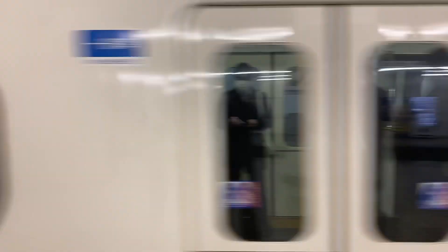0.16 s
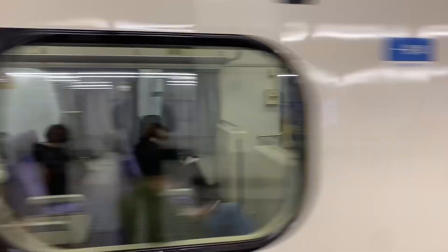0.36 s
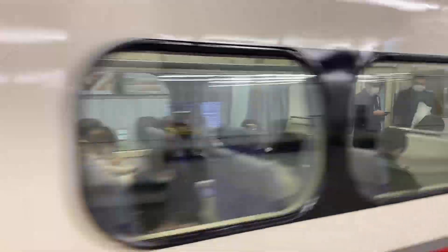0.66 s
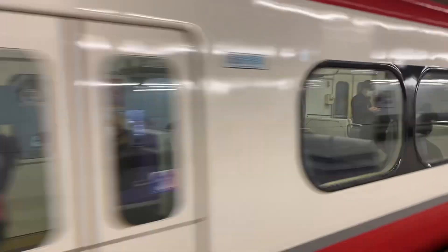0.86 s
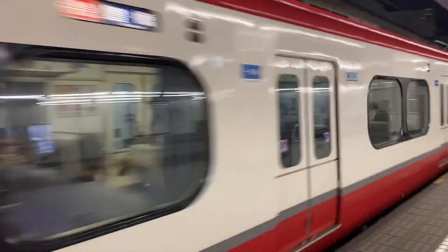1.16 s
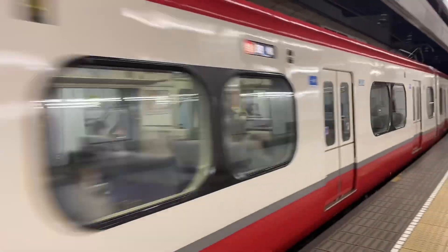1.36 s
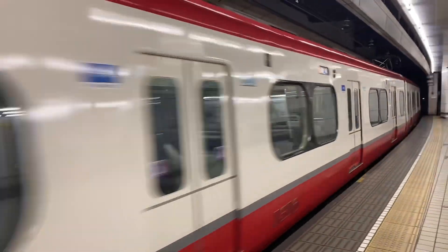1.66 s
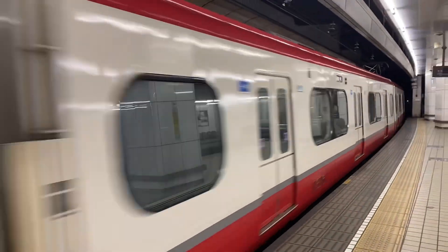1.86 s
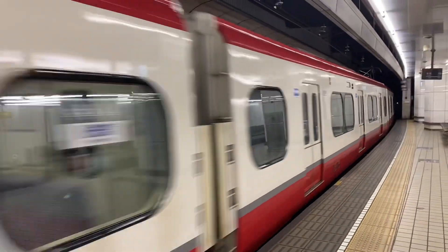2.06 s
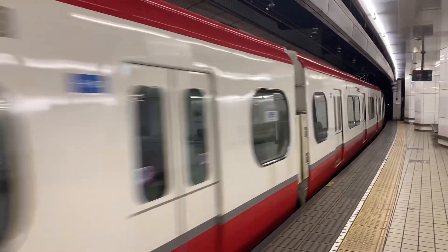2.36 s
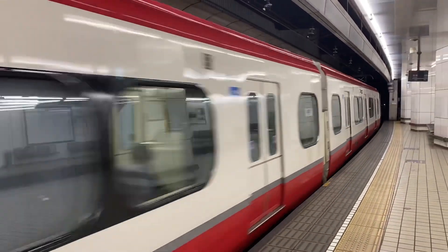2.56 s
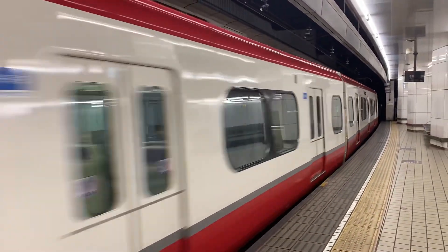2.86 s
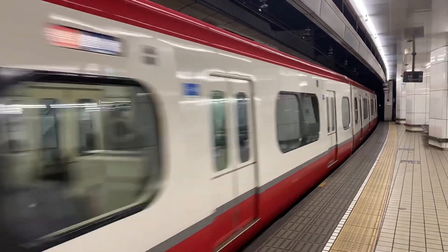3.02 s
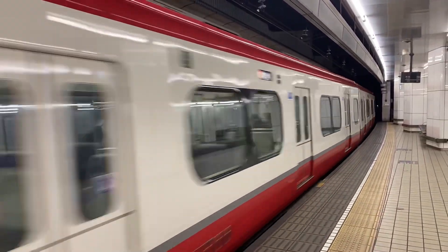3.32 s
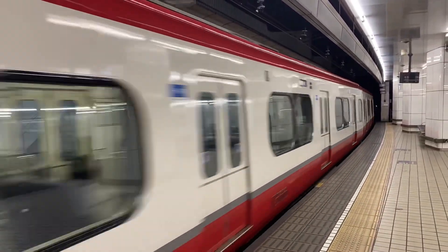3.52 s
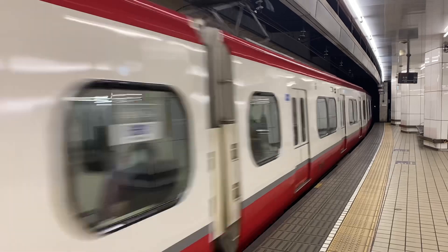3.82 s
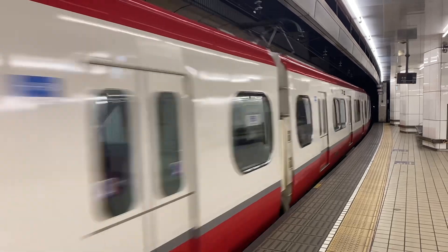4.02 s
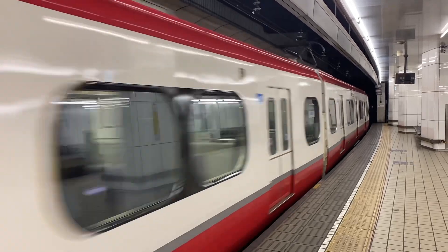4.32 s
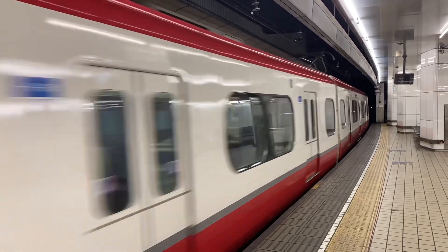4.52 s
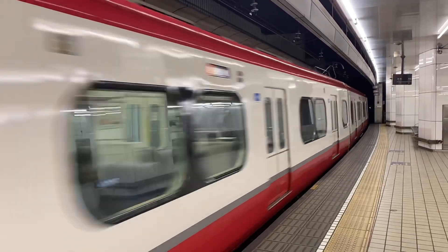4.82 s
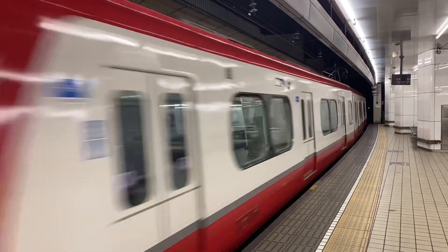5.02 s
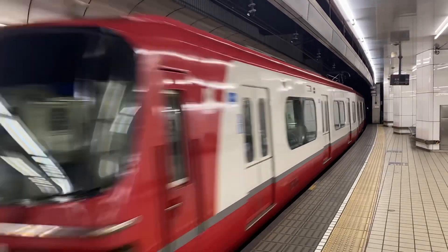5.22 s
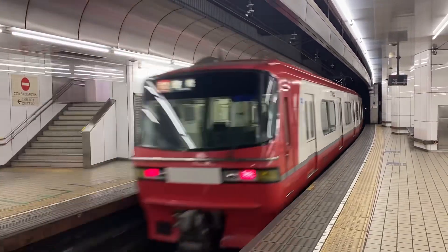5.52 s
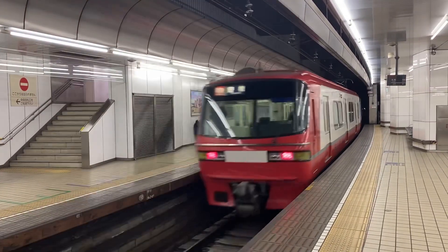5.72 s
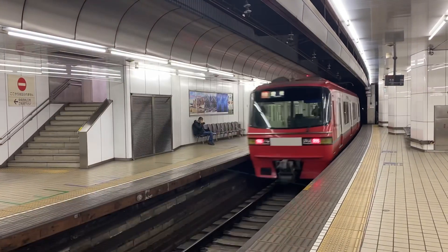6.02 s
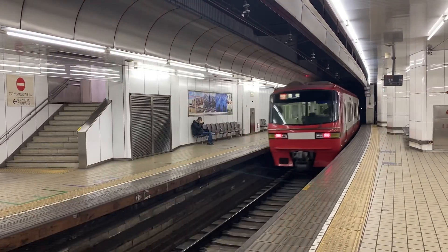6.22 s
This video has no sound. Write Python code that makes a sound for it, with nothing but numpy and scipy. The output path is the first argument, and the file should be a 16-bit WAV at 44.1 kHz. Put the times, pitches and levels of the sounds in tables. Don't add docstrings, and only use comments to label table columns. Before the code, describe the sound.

An electric train is already rushing past at 0 s, close to a stereo microphone on an underground platform edge, slightly nearer its left side. Low track rumble and hollow wheel roar fill the hard, echoing hall, with a thin ring of rails above. A mid-low gear whine climbs smoothly throughout, pulsing unevenly as side tones beat against it, strongest around 1.4 to 4.4 s. Dull thuds, booms and steel cracks cluster in the first 1.6 s, then recur near 2.0, 2.6, 3.2, 3.8, 4.3 and 4.8 s. Compressed air hisses brightly at 1.2 to 1.9 s with a brief breathy whistle, and more softly near 3 s. Airy gusts mark passing car gaps around 1.5, 3 and 5 s. The tail passes at about 5.25 s; whine and roar weaken, while heavy joint blows strike at 5.8 to 6.2 s, their boom lingering until the abrupt end at 6.4 s.

```python
import sys
import numpy as np
from scipy import signal
from scipy.fft import rfft, irfft, next_fast_len
from scipy.io import wavfile

SR = 44100
rng = np.random.default_rng(int(sys.argv[2]) if len(sys.argv) > 2 else 0)


def voltage_ratio(level):
    return 10 ** (np.asarray(level, float) / 20)


def unload_wav(signal):
    wavfile.write(
        sys.argv[1],
        SR,
        np.round(np.clip(np.atleast_2d(signal).T, -1, 1) * 32767).astype(np.int16),
    )


N = 281358

# time_s, pitch_hz
MESH_PITCH = [(0.0, 289.5), (1.25, 307.9), (1.75, 315.6), (2.1, 318.3), (2.5, 325.7), (3.0, 341.9),
              (3.2, 346.5), (3.5, 350), (4.0, 357.6), (4.5, 360.3), (5.25, 377.5), (6.38, 391.1)]
# time_s, level_db
WHEEL_NEARNESS = [(0.0, -2), (.2, 0.4), (0.45, -1), (0.72, -0.5), (1.0, 0), (1.25, 0), (1.62, 0.5),
                  (1.92, -1.5), (2.2, -1.5), (2.43, -4.5), (2.8, -3), (3.3, -1.5), (3.65, -4.5),
                  (4.15, -4.5), (4.42, -2.5), (4.95, -4.5), (5.25, -5.5), (5.79, -6), (6.05, -6)]
# pitch_hz, phase_rad
RIGHT_PHASE = [(40, .3), (350, .41), (700, .84), (1200, 1.2), (2000, 4.0), (3200, 7.5), (8000, 13)]
RIGHT_LAG_S = 0.00025
THUD_T60_S = 0.12


def seconds():
    return np.arange(N) / SR


def rms_one(x):
    return x / np.sqrt(np.mean(x ** 2) + 1e-20)


def in_time(rows):
    s, *columns = np.transpose(rows)
    return [np.interp(seconds(), s, column) for column in columns]


def at_hz(points, hz):
    point_hz, value = np.transpose(points)
    return np.interp(np.log(hz + 1), np.log(point_hz), value)


def bumps(rows, x):
    return sum(height * np.exp(-((x - centre) / half) ** 2) for centre, half, height in rows)


def band(x, edges_hz):
    return rms_one(signal.sosfilt(signal.butter(2, edges_hz, "band", fs=SR, output="sos"), x))


def drift(rate):
    r = np.exp(-80 * np.pi * rate / SR)
    slow = signal.lfilter([1], [1, -2 * r, r * r], rng.standard_normal(N // 40 + 2002))
    slow = slow[2000:]
    return np.interp(np.arange(N) / 40, np.arange(len(slow)), rms_one(slow - slow.mean()))


def complex_drift(rate):
    return drift(rate) + 1j * drift(rate)


def lagged(spec, hz):
    return np.array([spec, spec * np.exp(-1j * at_hz(RIGHT_PHASE, hz))])


def hall_noise(spectrum, patchy_db):
    # pitch_hz, likeness_0_to_1
    likeness = [(40, 1), (110, 1), (200, 0.89), (330, 0.93), (640, 0.7), (1200, .36), (1900, 0.34),
                (3000, 0.14), (8000, 0.12)]
    size = next_fast_len(N)
    hz = np.arange(size // 2 + 1) * SR / size
    low_hz, high_hz = spectrum[0][0], spectrum[-1][0]

    direct, *diffuse = rfft(rng.standard_normal((3, size)))
    alike = np.clip(at_hz(likeness, hz), 0, 1)
    spec = np.sqrt(alike) * lagged(direct, hz) + np.sqrt(1 - alike) * np.array(diffuse)
    spec = spec * voltage_ratio(at_hz(spectrum, hz))
    spec[:, (hz < low_hz / 2) | (hz > high_hz * 2)] = 0

    place = 2 * np.log2(hz + 1)
    together = drift(3.8)
    out = 0
    for k in range(int(2 * np.log2(low_hz)) - 2, int(2 * np.log2(high_hz)) + 4, 2):
        patch = irfft(spec * np.clip(1 - abs(place - k) / 2, 0, 1), size)[:, :N]
        out = out + patch * voltage_ratio(patchy_db * (.25 * together + drift(9)))
    return rms_one(out)


def tone(order, rough, wander_hz):
    cycles = np.cumsum(order * in_time(MESH_PITCH)[0]) / SR
    carrier = np.sqrt(1 - rough) * np.exp(.55j * drift(wander_hz / 2))
    shared = carrier + np.sqrt(rough / 2) * complex_drift(wander_hz)
    own = [0.16 * order ** 1.1 * complex_drift(wander_hz) for port in "LR"]
    late = np.exp(-1j * at_hz(RIGHT_PHASE, order * 340) * np.array([[0], [1]]))
    return rms_one(np.real((shared * late + own) * np.exp(2j * np.pi * cycles)))


def draught():
    # pitch_hz, level_db (per Hz)
    hiss_colour = [(1300, -8.5), (1800, 3), (2600, 4.5), (3300, 1.5), (4200, 3.5), (5200, -1.5),
                   (6400, -2.5), (7500, -10.5), (8500, -12), (11000, -24), (14000, -29), (15700, -38.5)]
    # time_s, lift_db, half_length_s
    gusts = [
        (0.0, 4.5, 0.3),
        (1.106, 1.5, 0.17),
        (1.539, 6, 0.47),
        (3.065, 6, 0.92),
        (4.956, 4, 0.37),
        (6.003, 0.5, .15),
    ]
    gust_db = bumps([(s, half_s, lift_db) for s, lift_db, half_s in gusts], seconds())
    level_db = -42 - 0.98 * seconds() + gust_db + 0.27 * in_time(WHEEL_NEARNESS)[0]
    fans = voltage_ratio(-9.0) * tone(10.9, rough=0.86, wander_hz=110.)
    return voltage_ratio(level_db) * (hall_noise(hiss_colour, patchy_db=.8) + fans)


def air_leaks():
    # pitch_hz, level_db (per Hz)
    sizzle_colour = [(4000, -26.5), (5000, -5), (5900, -5), (7000, -8), (8500, -8), (10000, -10.5),
                     (12000, -9), (13800, -2), (14700, -5), (15700, -2.5)]
    # start_s, end_s, start_level_db, end_level_db
    leaks = [
        (0.022, 0.905, -53.5, -62.5),
        (1.201, 1.866, -44, -49),
        (1.302, 1.437, -41, -41.5),
        (1.523, 1.679, -43.5, -46.5),
        (2.292, 2.909, -61.5, -58),
        (2.917, 3.415, -53, -48.5),
        (3.562, 4.772, -65, -67),
        (4.943, 5.138, -56, -55),
        (5.214, 5.398, -65, -81.5),
    ]
    rise_db_per_s, fall_db_per_s, floor_db = 81, 244.5, -77.5
    t = seconds()
    level_db = np.full(N, floor_db)
    for start, end, start_db, end_db in leaks:
        edges_db = rise_db_per_s * np.maximum(start - t, 0) + fall_db_per_s * np.maximum(t - end, 0)
        level_db = np.maximum(level_db, np.interp(t, [start, end], [start_db, end_db]) - edges_db)
    sizzle = hall_noise(sizzle_colour, patchy_db=.7)
    valve = bumps([(1.32, .13, voltage_ratio(-50.5))], t) * band(sizzle, [5170, 6500])
    return valve + voltage_ratio(level_db + 9.5) * sizzle


def wheels():
    # pitch_hz, level_db (per Hz)
    rumble_colour = [(24, -48.5), (36, -32.5), (48, -9), (100, -8.5), (150, -5), (220, -1), (280, -8),
                     (350, -35)]
    roar_colour = [(200, -35), (250, -3), (290, -0.5), (350, 1.5), (420, -3.5), (520, -7), (580, -15),
                   (700, -10), (900, -15.5), (1200, -17), (1500, -25), (2000, -37)]
    ring_colour = [(1100, -41), (1500, -8.5), (1680, -5), (1800, -1.5), (1950, 1.5), (2080, 1.5),
                   (2250, -5), (2450, -6), (2700, -16), (2950, -12.5), (3400, -21), (4100, -21),
                   (5000, -22.5), (8000, -49), (9500, -51.5)]
    near_db, = in_time(WHEEL_NEARNESS)
    rumble = voltage_ratio(-20.5 + 1.16 * near_db) * hall_noise(rumble_colour, patchy_db=1.5)
    roar = voltage_ratio(-18 + near_db) * hall_noise(roar_colour, patchy_db=1.65)
    ring_db = -38 + 0.6 * near_db + 0.9 * seconds()
    return rumble + roar + voltage_ratio(ring_db) * hall_noise(ring_colour, patchy_db=1.13)


def knocks():
    # time_s, level_db, pitch_hz
    dull_blows = [(0.102, -16.5, 200.5), (0.314, -16.5, 197), (.372, -12, 200), (.588, -12.5, 229),
                  (.83, -18, 196), (1.293, -23.5, 226), (1.419, -21, 125.7), (1.498, -12, 205.4),
                  (1.627, -16, 198), (2.62, -18.5, 130), (3.235, -21.5, 136), (4.83, -16, 136),
                  (5.829, -26, 119.4), (5.938, -14.5, 197), (5.983, -17.5, 127.5), (6.032, -18, 162),
                  (6.05, -25, 140), (6.196, -25.5, 245.6)]
    # time_s, peak_db, pitch_hz
    cracks = [(0.429, -17.5, 584), (0.57, -14, 608), (0.754, -12.5, 618), (0.862, -14, 501),
              (1.082, -14.5, 792), (1.436, -11.5, 835), (2.031, -16.5, 501), (2.612, -17.5, 693),
              (2.721, -18.5, 690), (2.849, -16, 706), (4.293, -19, 777), (4.823, -16.5, 705),
              (5.806, -15, 845), (5.866, -16, 812), (5.968, -14, 905)]
    crack_t60_s = 0.038
    out, t = np.zeros(N + SR), np.arange(SR // 4) / SR
    for s, level_db, hz in dull_blows:
        i = round(s * SR)
        shape = voltage_ratio(level_db + 8.0 - 60 * t / THUD_T60_S) * (1 - np.exp(-t / 0.0086))
        out[i:i + len(t)] += shape * np.sin(2 * np.pi * hz * t)
    for s, peak_db, hz in cracks:
        i = round(s * SR)
        pair = np.sin(2 * np.pi * hz * t) + 0.37 * np.sin(2 * np.pi * 1.7 * hz * t)
        out[i:i + len(t)] += voltage_ratio(peak_db - 5 - 60 * t / crack_t60_s) * pair
    return np.array([out[:N], np.roll(out, round(RIGHT_LAG_S * SR))[:N]])


def joints():
    # time_s, clank_db, thud_db, thud_hz
    joint_blows = [(0.017, -35.5, -30, 210), (0.185, -34, -19, 183), (0.428, -32, -22.5, 189),
                   (0.748, -19, -13.5, 173), (0.97, -34, -13, 195), (1.429, -28, -14.5, 176),
                   (1.631, -27.5, -23.5, 179.6), (2.031, -34, -24, 182), (2.241, -30, -16.5, 170.5),
                   (2.633, -27.5, -11.5, 200), (2.722, -32, -30, 189), (2.839, -31.5, -28, 197),
                   (3.241, -25.5, -20, 187), (3.786, -37, -13.5, 185), (4.289, -29, -26, 203),
                   (4.477, -36.5, -24, 129), (4.818, -24, -18, 190), (4.981, -42, -10.5, 212),
                   (5.8, -23.5, -8, 210), (5.965, -26.5, -6, 228.6), (6.005, -35, -20, 172),
                   (6.115, -43, -19.5, 188)]
    # pitch_hz, level_db (per Hz)
    clank_colour = [(300, -11), (500, 1), (700, 5.5), (900, 1), (1250, -6), (1500, -20), (4000, -29),
                    (6000, -53.5)]
    boom_colour = [(50, -25.5), (100, -4.5), (140, 5), (200, 2), (260, -3.5), (350, -27.5)]
    thud_late_s, clank_hold_s, clank_t60_s, hall_t60_s = 0.02148, 0.045, 0.63, 0.64
    clank, boom, thud = np.zeros(N), np.zeros(N), np.zeros(N)
    t = np.arange(SR // 2) / SR
    for s, clank_db, thud_db, thud_hz in joint_blows:
        i, j = round(s * SR), round((s + thud_late_s) * SR)
        clank_fall_db = 60 * np.maximum(t - clank_hold_s, 0) / clank_t60_s
        clank_shape = voltage_ratio(clank_db - clank_fall_db) * (1 - np.exp(-t / 0.0017))
        clank[i:i + len(t)] += clank_shape[:N - i]
        boom_shape = voltage_ratio(thud_db - 9.0 - 60 * t / hall_t60_s) * (1 - np.exp(-t / 0.016))
        boom[j:j + len(t)] += boom_shape[:N - j]
        thud_shape = voltage_ratio(thud_db + 4.5 - 60 * t / THUD_T60_S) * (1 - np.exp(-t / 0.0057))
        thud_tone = np.sin(2 * np.pi * thud_hz * t) + 0.36 * np.sin(np.pi * thud_hz * t)
        thud[j:j + len(t)] += (thud_shape * thud_tone)[:N - j]
    thud = np.array([thud, np.roll(thud, round(RIGHT_LAG_S * SR))])
    steel = hall_noise(clank_colour, patchy_db=-1.5)
    bright_db = -11.5 + 5.5 * (seconds() - N / SR)
    bright = voltage_ratio(bright_db) * band(steel, [850, 1400])
    return clank * (steel + bright) + boom * hall_noise(boom_colour, patchy_db=-3.5) + thud


def swelling(rows):
    t = np.arange(0, N, 40)[:, None] / SR
    s, peak_db, half_s = np.transpose(rows)
    swells = voltage_ratio(peak_db) * np.cos(np.pi / 2 * np.clip((t - s) / (1.15 * half_s), -1, 1)) ** 3.13
    return in_time(np.transpose([t[:, 0], swells.sum(axis=1)]))[0]


def mesh_tone():
    # time_s, peak_db, half_length_s
    mesh_swells = [(0.04, -16.5, 0.022), (0.09, -14, 0.091), (0.22, -15, 0.088), (0.39, -15, 0.077),
                   (0.45, -9, 0.013), (0.52, -22.5, 0.066), (0.59, -12.5, 0.064), (0.65, -16, 0.025),
                   (0.72, -18.0, 0.032), (0.78, -15, 0.035), (0.86, -26.5, 0.039), (0.93, -25, 0.023),
                   (1.04, -20, 0.031), (1.13, -25, 0.094), (1.27, -16.0, 0.042), (1.38, -12, 0.083),
                   (1.54, -16, 0.047), (1.58, -13, 0.073), (1.69, -13, 0.11), (1.81, -25.5, 0.028),
                   (1.9, -9.5, 0.094), (2.03, -10, 0.11), (2.13, -16, 0.032), (2.2, -11.5, 0.047),
                   (2.34, -10, 0.07), (2.39, -18, 0.035), (2.46, -8.5, 0.052), (2.54, -17.5, 0.078),
                   (2.71, -18, 0.03), (2.8, -14, 0.016), (2.9, -13.5, 0.073), (3.02, -14.5, 0.043),
                   (3.06, -23, 0.022), (3.11, -11, 0.061), (3.18, -15.5, 0.049), (3.25, -12.5, 0.032),
                   (3.31, -11.5, 0.051), (3.38, -10.5, 0.054), (3.45, -17.5, 0.055), (3.55, -21, 0.03),
                   (3.6, -17, 0.13), (3.71, -13, 0.028), (3.77, -13.5, 0.06), (3.89, -28, 0.035),
                   (3.95, -13, 0.055), (4.13, -14.5, 0.087), (4.18, -19.5, 0.022), (4.34, -11, 0.068),
                   (4.56, -22.5, 0.042), (4.65, -29.5, 0.083), (4.77, -20.5, 0.083), (4.99, -30, 0.1),
                   (5.09, -12.5, 0.029), (5.3, -28, 0.05), (5.48, -28.5, 0.17), (5.75, -19.5, 0.092)]
    gain = voltage_ratio(-29 - 0.17 * seconds()) + swelling(mesh_swells)
    return gain * tone(1, rough=.07, wander_hz=9.0)


def side_tones():
    # multiple_of_mesh_pitch, roughness_0_to_1, wander_hz
    side_orders = [
        (.875, .05, 6),
        (1.12, .05, 6),
        (1.44, .3, 8),
        (2.01, .8, 40),
    ]
    # start_level_db, fade_db_per_s, flutter_db
    side_levels = [
        (-35, 1.0, 1.0),
        (-34, 1.5, 1.0),
        (-34, 4, 2),
        (-34.5, 0.3, 1.5),
    ]
    # pitch_hz, half_width_hz, lift_db
    body = [
        (424, 1.8, 4.5),
        (666, 21, 6.5),
    ]
    # time_s, peak_db, half_length_s
    lower_swells = [(0.08, -24.5, 0.036), (0.13, -26.0, 0.035), (0.22, -19.5, 0.106), (0.69, -20.5, 0.075),
                    (0.75, -24.0, 0.042), (0.84, -22.5, 0.036), (0.88, -25.0, 0.035), (1.07, -22.5, 0.095),
                    (1.31, -19.5, 0.051), (1.4, -23.5, 0.037), (1.54, -25.5, 0.04), (1.83, -22.5, 0.068),
                    (2.37, -19.5, 0.12), (2.55, -20.0, 0.083), (2.73, -25.0, 0.12), (3.03, -21.5, 0.07),
                    (3.18, -17.5, 0.083), (3.38, -16.0, 0.066), (3.55, -22.0, 0.037), (3.63, -20.0, 0.054),
                    (3.76, -24.0, 0.08), (3.91, -20.0, 0.094), (4.12, -21.5, 0.12), (4.38, -22.5, 0.058),
                    (4.57, -21.5, 0.102), (4.71, -21.5, 0.044), (4.85, -25.5, 0.12), (5.11, -24.0, 0.098),
                    (5.17, -24.0, 0.047), (6.03, -26.5, 0.082)]
    upper_swells = [(0.04, -18.5, 0.027), (0.13, -28, 0.021), (0.4, -19, 0.051), (0.69, -25.5, 0.11),
                    (0.88, -33.5, 0.026), (0.98, -24.0, 0.033), (1.07, -18.5, 0.076), (1.29, -21, 0.031),
                    (1.4, -17.5, 0.13), (1.46, -23.5, 0.032), (1.63, -17, 0.12), (1.76, -9.5, 0.035),
                    (1.86, -14.5, 0.064), (2.17, -13.0, 0.15), (2.31, -15.5, 0.035), (2.35, -25.5, 0.035),
                    (2.45, -22.5, 0.12), (2.67, -23, 0.066), (2.93, -25.5, 0.053), (3.04, -21.5, 0.065),
                    (3.16, -22, 0.048), (5.35, -32, 0.051)]
    wide_swells = [(0.15, -18.5, 0.032), (0.24, -21, 0.12), (0.32, -25, 0.048), (0.41, -24, 0.035),
                   (0.51, -25.5, 0.15), (0.64, -28.5, 0.035), (0.78, -27.5, 0.025), (0.84, -23.5, 0.06),
                   (0.98, -29.5, 0.068), (1.34, -29, 0.06), (1.5, -29.5, 0.071), (1.74, -30, 0.031),
                   (2.31, -28, 0.047), (2.66, -28, 0.084)]
    second_swells = [(.06, -28, .09), (.2, -30, .05), (.46, -30.5, .04), (.57, -34, .04),
                     (.76, -26.5, .044), (1.11, -34, .05), (1.23, -31, .04), (1.42, -30.5, .04),
                     (1.77, -28.5, 0.052), (1.86, -30, .05), (1.98, -32, .04), (2.25, -29.5, .045),
                     (2.68, -32, .06), (2.85, -28.5, .07), (3.2, -34, 0.096), (3.28, -30, .06),
                     (3.98, -33.5, .07), (4.74, -33, .05), (4.83, -33, 0.045)]
    mesh_hz, = in_time(MESH_PITCH)
    all_swells = [lower_swells, upper_swells, wide_swells, second_swells]
    out = 0
    for side_order, side_level, swells in zip(side_orders, side_levels, all_swells):
        order, rough, wander_hz = side_order
        level_db, fade_db_per_s, flutter_db = side_level
        lift_db = bumps(body, order * mesh_hz) + flutter_db * drift(2.0)
        steady = voltage_ratio(level_db - fade_db_per_s * seconds() + lift_db)
        out = out + (steady + voltage_ratio(-2.5) * swelling(swells)) * tone(order, rough, wander_hz)
    return out


def gears():
    return mesh_tone() + side_tones()


def scene():
    return draught() + air_leaks() + wheels() + knocks() + joints() + gears()


def top_cut(x):
    return signal.sosfilt(signal.butter(12, 16620, fs=SR, output="sos"), x)


def record(dry):
    # pitch_hz, left_minus_right_db
    balance = [(100, -.5), (700, 0.5), (1400, -2), (2100, -4), (3300, -0.5), (4200, 0.5), (16000, -2.5)]
    # low_hz, high_hz
    mid_gaps = [
        (8330, 9650),
        (12520, 13750),
        (15770, 22050),
    ]
    side_gaps = [
        (10370, 11800),
        (14700, 22050),
    ]
    gap_edge_hz, gap_edge_db = 700, -9
    x = dry / (1 + abs(dry / 1.15) ** 4) ** .25
    x = x * np.clip(np.minimum(np.arange(N), np.arange(N)[::-1]) / (.002 * SR), 0, 1)

    size = next_fast_len(N + SR // 10)
    hz = np.arange(size // 2 + 1) * SR / size
    left, right = rfft(x, size) * voltage_ratio(at_hz(balance, hz) * np.array([[.5], [-.5]]))
    mid, side = (left + right) / 2, (left - right) / 2
    for lost, kept, gaps in ((mid, side, mid_gaps), (side, mid, side_gaps)):
        for low, high in gaps:
            outside_hz = np.maximum(low - hz, hz - high)
            inside = (hz > low) & (hz < high)
            lost *= voltage_ratio(gap_edge_db * np.clip(1 - outside_hz / gap_edge_hz, 0, 1))
            lost[inside] = 0
            kept[inside] *= np.sqrt(2)
    mix = irfft(np.array([mid + side, mid - side]), size)[:, :N]
    return top_cut(mix)


dry = scene()
out = record(dry)
unload_wav(out)
```